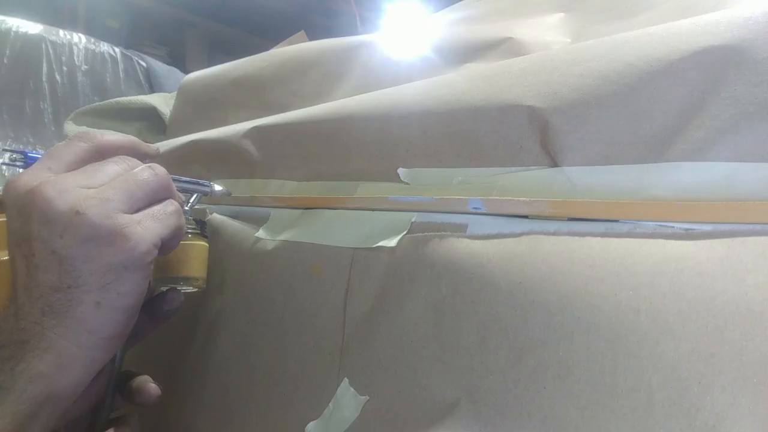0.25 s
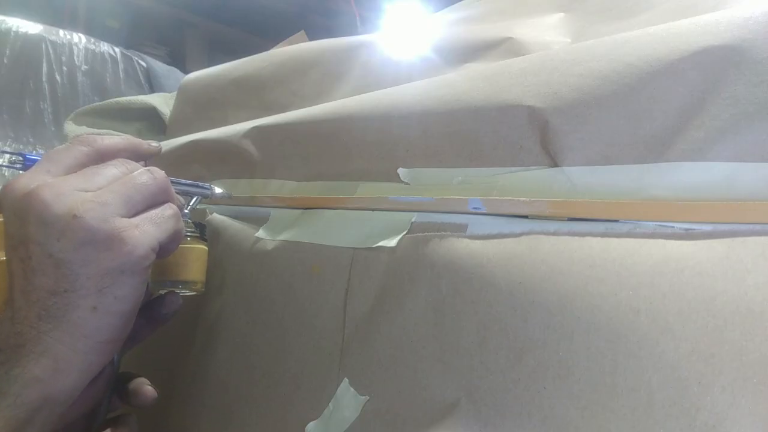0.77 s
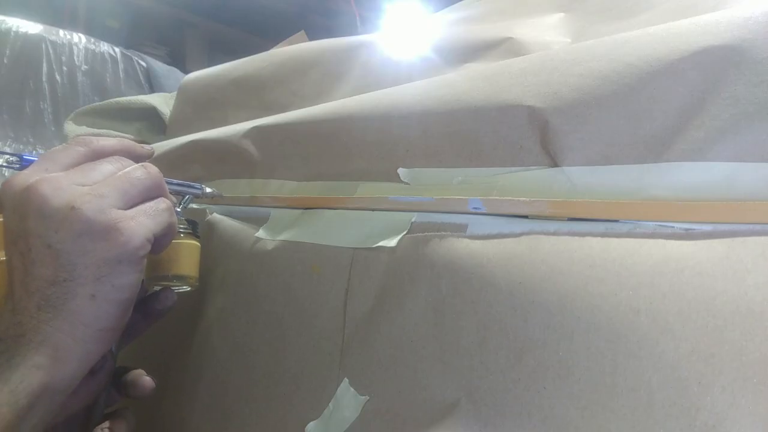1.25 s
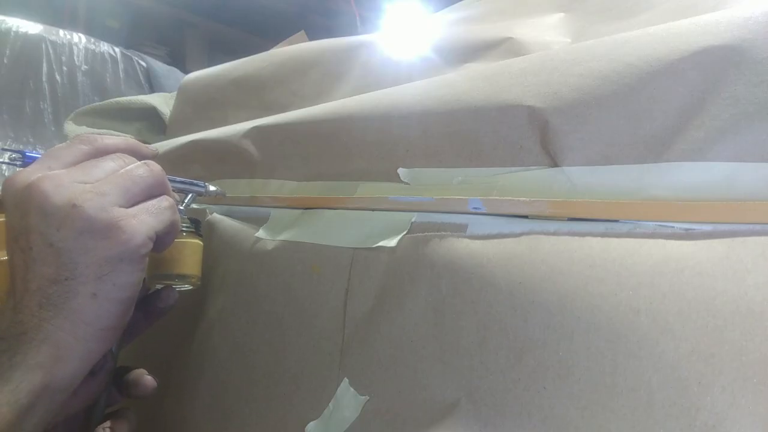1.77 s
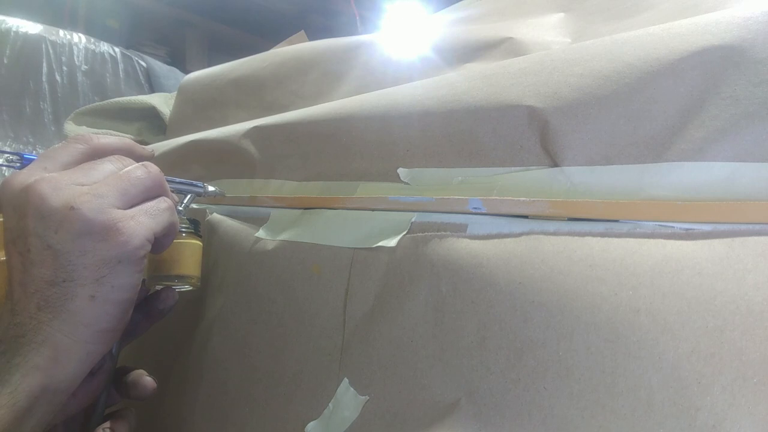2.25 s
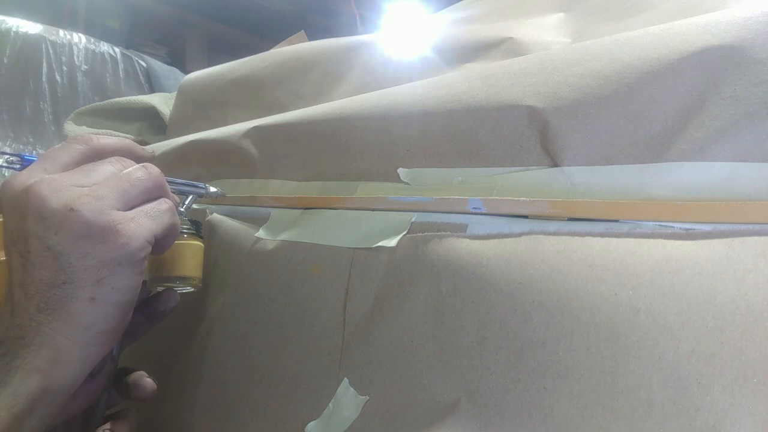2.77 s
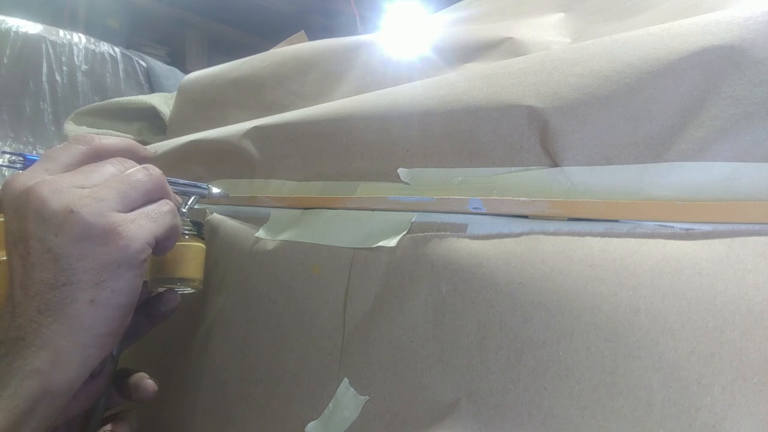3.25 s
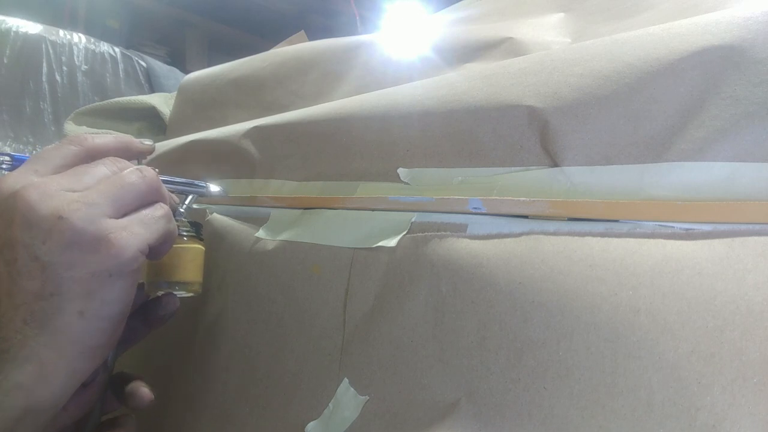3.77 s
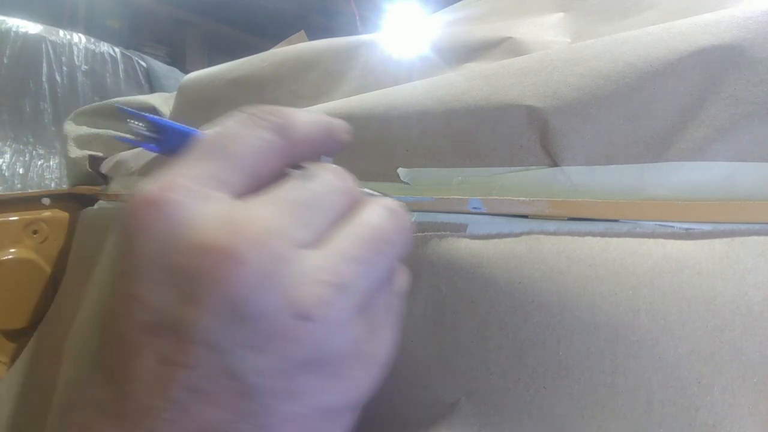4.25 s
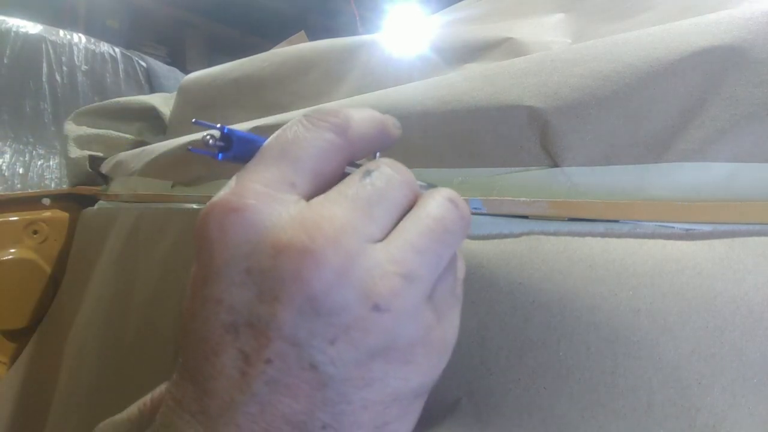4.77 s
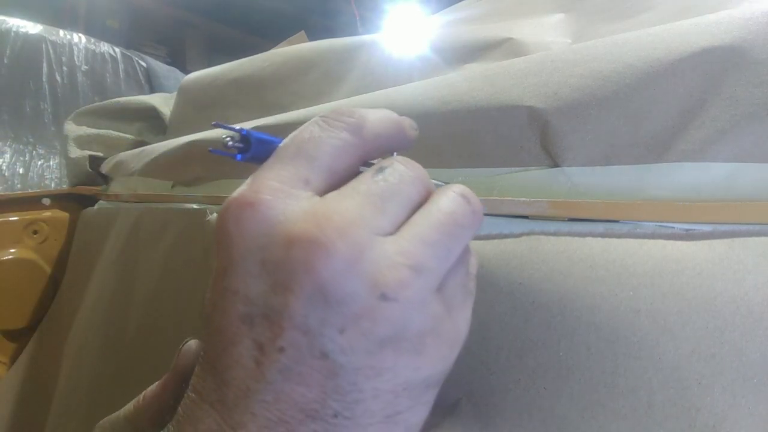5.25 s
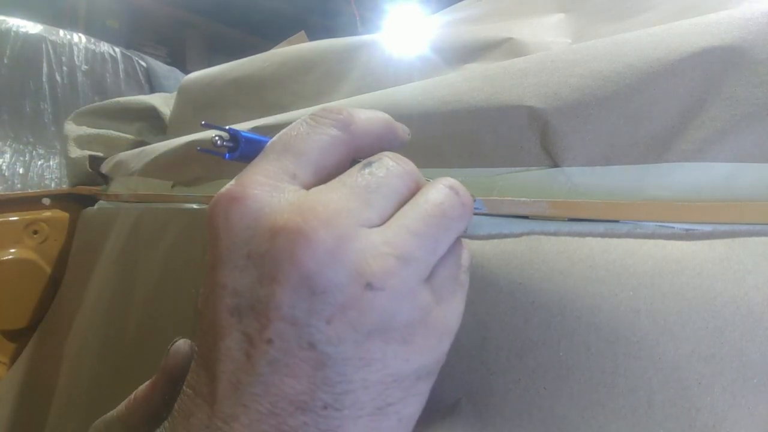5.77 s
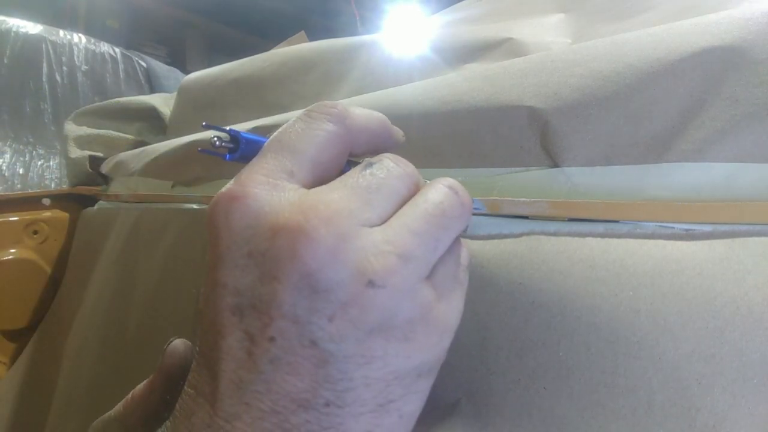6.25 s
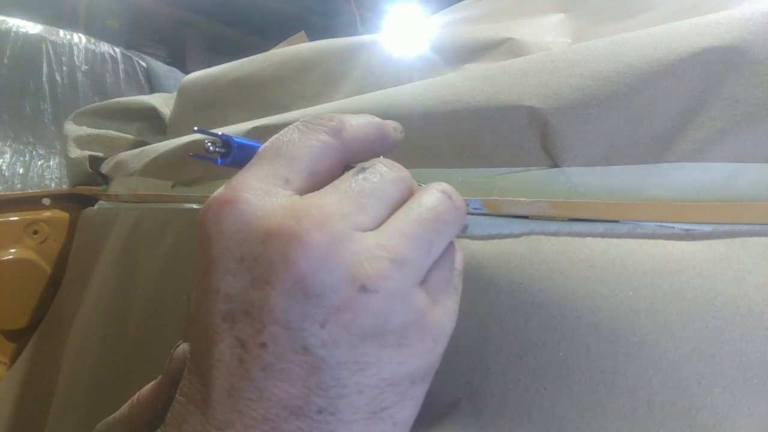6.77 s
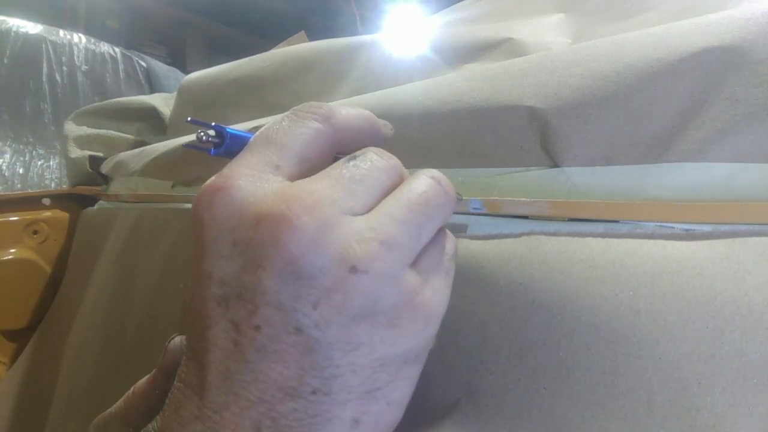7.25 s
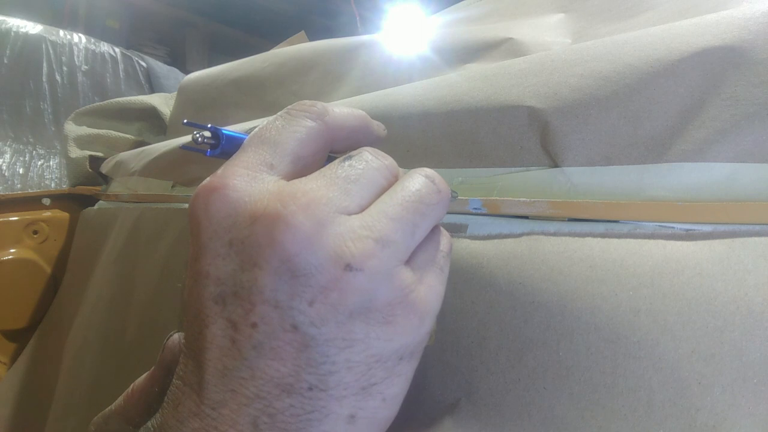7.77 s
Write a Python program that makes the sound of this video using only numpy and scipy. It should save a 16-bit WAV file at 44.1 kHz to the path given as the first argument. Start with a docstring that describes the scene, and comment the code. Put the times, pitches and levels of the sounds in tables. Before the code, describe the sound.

An airbrush sprays paint close to the microphone in a quiet garage, hissing in four bursts that each cut off sharply. The second burst is the longest and wavers in strength. In the long pause after it, a hand softly brushes masking paper, a small metal fitting clinks and the hand bumps a panel. Two more bursts follow. Very faint crickets chirp over a low room rumble.

```python
"""Garage: an airbrush sprays masked car bodywork in four bursts, close by.
The air jet hisses, coloured by reflections from hand and panel; the trigger swells and brightens it.
In the long pause the hand brushes the masking paper, a metal fitting clinks, the hand bumps the panel.
Two faint crickets chirp over a low room rumble."""
import sys
import numpy as np
from scipy import signal
from scipy.fft import rfft, irfft
from scipy.io import wavfile

SR = 44100
rng = np.random.default_rng(int(sys.argv[2]) if len(sys.argv) > 2 else 0)


def transcribe(u):
    """Save the signal u as a 16-bit wav file named by the first command-line argument.

    u: samples, shape (n,) or (channels, n), limited to [-1, 1]; the rate is SR.
    q: integer samples, one column per channel.
    """
    v = np.clip(np.atleast_2d(u).T, -1, 1)
    q = np.round(v * 32767).astype(np.int16)
    wavfile.write(sys.argv[1], SR, q)


N = 352800
TIME, FREQ = np.arange(N) / SR, np.fft.rfftfreq(N, 1 / SR)


def airbrush(usual_db=-36, flutter_db=0.4, buffet_db=0.4, dulling=0.37):
    """Valve-gated air jet, as (close, room send); paint flow flutters, air buffets the panel."""
    # open t/s, shut t/s, opening time/s, hand position index, rush trim/dB, fizz trim/dB
    bursts = [(-.1, 0.713, .02, 0, -15.5, -9.5), (1.384, 3.534, 0.022, 0, -17, -8.5),
              (5.646, 6.592, 0.04, 1, -12.5, -6), (7.086, 8.2, .02, 2, -11, -12)]
    # jet strength under the trigger, per burst: t/s, level/dB
    strengths = [[(0.01, -29.5), (0.154, -33.5), (0.286, -29), (0.348, -36), (0.7, -39)], [(1.39, -37.5), (1.56, -32), (1.69, -36.5), (1.86, -30), (2.03, -31),
                                     (2.08, -35), (2.24, -34.5), (2.37, -30.5), (2.44, -34.5), (2.62, -32),
                                     (2.75, -36.5), (3.31, -37.5), (3.43, -30), (3.53, -32)], [(5.66, -37), (6.504, -37.5), (6.59, -42.5)], [(7.1, -36.5), (7.2, -37),
                                                                            (7.57, -34), (7.694, -36),
                                                                            (7.802, -31.5), (7.98, -31)]]
    # jet spectrum, per hand position: f/Hz, level/dB
    colours = [[(150.0, -37), (350.0, -25), (520.0, -25.5), (750.0, -20.5), (1050.0, -25.5),
                (1600.0, -16.5), (2300.0, -9), (3500.0, 0), (5500.0, -0.5), (8200.0, 2.5), (10500.0, -9),
                (13000.0, -13), (15500.0, -12.5)], [(150.0, -33), (350.0, -17.5), (520.0, -25), (750.0, -15),
                                    (1050.0, -19.5), (1600.0, -4.5), (2300.0, -5.5), (3500.0, 3.5),
                                    (5500.0, 4), (8200.0, 0), (10500.0, -9), (13000.0, -11),
                                    (15500.0, -13.5)], [(150.0, -34), (350.0, -16.5), (520.0, -30.5),
                                                         (750.0, -15), (1050.0, -20.5), (1600.0, -7),
                                                         (2300.0, -5.5), (3500.0, 1), (5500.0, -3.5),
                                                         (8200.0, -2.5), (10500.0, -13), (13000.0, -24),
                                                         (15500.0, -20)]]
    # reflections off hand, cup and panel, per position: delay/ms, gain
    echoes = [[(0.444, -0.12), (0.579, 0.2), (0.71, 0.17), (0.946, 0.087), (1.013, -0.18), (1.128, 0.14),
               (1.232, -0.13), (1.937, -0.13)], [(0.266, 0.15), (0.547, -0.13), (0.673, -0.18), (0.785, -0.098),
                                   (0.943, -0.26), (1.3, -0.052), (1.467, -0.15), (2.02, -0.13)], [(0.491, 0.085), (0.617, 0.12), (0.716, 0.13),
                                                        (0.875, 0.21), (0.95, -0.069), (1.201, 0.113),
                                                        (1.401, 0.049), (2.047, -0.097)]]
    # peaks and notches of the hand-panel hollow, per position: f/Hz, width/Hz, level/dB
    hollows = [[(947, 71, 8.5), (1390, 200, 3.5), (1490, 93, -4), (2296, 83, 5.5), (3620, 330, 4.5),
                (3800, 430, -11), (3850, 46, 16), (4004, 56, 13), (4450, 87, 2.5), (4800, 200, -3),
                (5500, 36, -19), (6020, 78, 8.5), (6220, 170, -7.5), (6680, 48, 11), (7230, 43, 3),
                (9050, 48, -1), (9600, 590, 5), (11300, 70, 3.5), (12550, 250, 3), (13050, 187, 2)], [(603, 96, 5.5), (1240, 150, 5), (1463, 48, 6), (2500, 66, 6),
                                    (2530, 96, -3), (3030, 60, 6.5), (3666, 120, 2.5), (3870, 120, -8),
                                    (4350, 91, 4.5), (4770, 70, -10), (5050, 200, 2), (5320, 78, -10),
                                    (7440, 250, -12), (10530, 60, 7), (12700, 61, 7.6)], [(563, 180, 17.5), (1390, 93, -5.5),
                                                         (2810, 73, 7.5), (2900, 76, -4), (3430, 60, -3),
                                                         (3710, 110, 7), (4200, 480, 4), (4880, 53, -10),
                                                         (4960, 200, 9), (5710, 60, -8), (5780, 170, 8.5),
                                                         (6660, 200, 7.5), (12300, 260, 7), (13182, 270, 6),
                                                         (14150, 300, 5), (14650, 200, -4)]]
    # drift between thin (-) and hollow (+) spray: t/s, rush gain/dB
    tilt = [(0, 0), (1.4, -1.5), (1.68, -1.5), (1.98, .3), (2.58, 1.4), (2.85, -0.1), (5.64, -0.2),
            (6.0, 4), (6.36, -1.5), (6.52, -1), (8, -2)]
    positions = [jet_bands(*tables) for tables in zip(colours, echoes, hollows)]
    buffet = amp(buffet_db * wander(rate_hz=150))
    tilt_db = np.interp(TIME, *np.transpose(tilt), 0, 0)
    out = np.zeros((2, N))
    for (open_s, shut_s, opening_s, position, rush_trim_db, fizz_trim_db), jet in zip(bursts, strengths):
        rush, hiss, fizz = positions[position]
        lift = valve(open_s, shut_s, opening_s)
        # stronger jet: brighter
        push_db = np.interp(TIME, *np.transpose(jet)) - usual_db
        rush_db = rush_trim_db - 0.48 + 0.26 * push_db + tilt_db
        hiss_db = push_db - 1.25
        fizz_db = fizz_trim_db - 0.5 + 1.23 * push_db - 0.65 * tilt_db
        # half-open valve: slow, dull jet; rush first, fizz last
        out += rush * amp(rush_db) * buffet * lift ** (1 - dulling)
        out += hiss * amp(hiss_db) * lift
        out += fizz * amp(fizz_db) * lift ** (1 + dulling)
    return out * amp(usual_db + flutter_db * wander(rate_hz=45))


def jet_bands(colour, echoes, hollow):
    """Turbulence split into panel rush, hiss and atomising fizz; each as (combed by surfaces, free)."""
    comb = 1 + sum(gain * np.exp(-2j * np.pi * FREQ * ms / 1000) for ms, gain in echoes)
    free = rfft(rng.standard_normal(N)) * amp(log_interp(colour, FREQ))
    close = free * comb * amp(peaks_db(hollow))
    low = 1 / (1 + (FREQ / 2300) ** 8)
    high = 1 - 1 / (1 + (FREQ / 10300) ** 16)
    bands = []
    for share, lo_hz, hi_hz in [(low, 500, 2200), (1 - low - high, 2500, 10000), (high, 10500, 15500)]:
        reference_rms = np.std(irfft(close * (FREQ > lo_hz) * (FREQ < hi_hz), N))
        bands.append(irfft(np.array([close, free]) * share, N) / reference_rms)
    return bands


def valve(open_s, shut_s, opening_s, leak_db=-22, leak_s=0.022, snap_s=0.007):
    """Air leaks as the trigger goes down, the valve lifts, its spring snaps it shut."""
    early_s = np.maximum(open_s - TIME, 0)
    leak = amp(leak_db) * np.exp(-early_s / leak_s)
    lift = np.maximum(np.exp(-3 * early_s / opening_s), leak)
    return lift * np.exp(-np.maximum(TIME - shut_s, 0) / snap_s)


def hand_rubs(rise_s=0.0019):
    """Sleeve and hand slide and scuff over masking paper: shaped friction noise."""
    # friction spectra: f/Hz, level/dB
    sleeve_colour = [(100, -32), (200, -0.5), (270, -6), (390, 3), (560, -10.5), (1300, -16.5), (3000, -30)]
    paper_colour = [(300, -24), (700, -4), (1300, -4), (1700, -9), (2300, 0), (3400, -5), (5000, -15),
                    (12000, -30)]
    # peak t/s, swell/s, fade/s, sleeve level/dB, paper level/dB
    slides = [(4.75, .6, 0.44, -70.5, -83), (5.04, 0.05, 0.071, -64, -69), (5.19, 0.088, 0.068, -78, -69)]
    # t/s, level/dB, decay/s, low f/Hz, high f/Hz
    scuffs = [(4.535, -70, .008, 700, 1800), (4.742, -63, .007, 800, 2000), (4.983, -65, 0.024, 900, 4200),
              (5.008, -54, 0.015, 900, 5240)]
    sleeve, paper, out = noise(sleeve_colour), noise(paper_colour), np.zeros(N)
    for at_s, swell_s, fade_s, sleeve_db, paper_db in slides:
        speed = np.exp(-((TIME - at_s) / np.where(TIME < at_s, swell_s, fade_s)) ** 2)
        out += speed * (amp(sleeve_db) * sleeve + amp(paper_db) * paper)
    t = np.arange(SR // 4) / SR
    for at_s, db, decay_s, lo_hz, hi_hz in scuffs:
        bandpass = signal.butter(4, [lo_hz, hi_hz], "band", fs=SR, output="sos")
        rub = unit(signal.sosfilt(bandpass, rng.standard_normal(len(t))))
        stroke = (1 - np.exp(-t / rise_s)) * np.exp(-t / decay_s)
        add(out, at_s, amp(db) * rub * stroke / stroke.max())
    return out


def knocks():
    """A small metal fitting clinks and the hand bumps the panel; each rings in its modes."""
    # strikes: t/s, level/dB
    clinks = [(5.011, -54.5), (5.024, -60)]
    bumps = [(5.19, -46.5), (5.218, -61), (5.226, -53), (5.238, -66)]
    # modes: f/Hz, level/dB, t60/s
    fitting = [(1360, -2, 0.12), (2050, -7, 0.091), (3560, -4, 0.072), (3758, 0, 0.073), (4460, -2, 0.1),
               (4860, -4, .1), (5220, -7, .11), (7833, -6, 0.11), (11900, -14, .07)]
    panel = [(204, 1.5, 0.058), (240, 0, .05), (372, 5.5, 0.068), (447, -6, 0.076), (570, -9, 0.078),
             (785, -9, .06), (1040, -20, .05), (1400, -16, .06)]
    out = np.zeros(N)
    for at_s, db in clinks:
        add(out, at_s, amp(db) * ring(fitting, rise_s=0.00091))
    for at_s, db in bumps:
        add(out, at_s, amp(db) * ring(panel, rise_s=0.0019))
    return out


def ring(modes, rise_s):
    """Struck body: decaying sines, soft onset."""
    t = np.arange(SR // 3) / SR
    partials = sum(amp(db - 60 * t / t60_s) * np.sin(2 * np.pi * hz * t) for hz, db, t60_s in modes)
    return partials * (1 - np.exp(-t / rise_s))


def crickets():
    """Two crickets, one higher, one lower, in runs of even chirps."""
    # start t/s, end t/s, chirp period/s
    high_runs = [(.799, 3.6, .1263), (3.663, 4.0, .1305), (4.178, 6.6, .118), (6.695, 8.0, .129)]
    low_runs = [(.857, 6.65, .1332), (6.768, 8.0, .1345)]
    high = cricket(high_runs, glide_hz=(7400, 6960), stroke_s=0.0099, step_s=0.026,
                   strokes_db=[-70, -67.5, -79])
    low = cricket(low_runs, glide_hz=(6900, 6640), stroke_s=0.01, step_s=0.029, strokes_db=[-69, -72])
    return high + low


def cricket(runs, glide_hz, stroke_s, step_s, strokes_db, jitter_s=0.002):
    """Each chirp is a few wing strokes, each stroke a short falling tone."""
    out, size = np.zeros(N), round(stroke_s * SR)
    phase = 2 * np.pi * np.cumsum(np.linspace(*glide_hz, size)) / SR
    window = signal.windows.tukey(size, 0.6)
    for at_s in np.concatenate([np.arange(*run) for run in runs]):
        for k, db in enumerate(strokes_db):
            force, detune, late = rng.standard_normal(3)
            tone = np.sin(phase * (1 + 0.009 * detune)) * window
            add(out, at_s + k * step_s + jitter_s * late, amp(db + 1.7 * force) * tone)
    return out


def clutter(x, scatter_db):
    """Small nearby objects scatter the treble and ripple its spectrum."""
    size = round(0.012 * SR)
    taps = rng.standard_normal(size) * (np.arange(size) > size // 6)
    taps = signal.sosfilt(signal.butter(1, 4000, "high", fs=SR, output="sos"), taps)
    return x + amp(scatter_db) * signal.fftconvolve(x, taps / np.linalg.norm(taps))[:N]


def garage(x, predelay_s=0.003, tap_density=0.05):
    """Reverberation: sparse reflections of random sign, dying away band by band."""
    # f/Hz, t60/s
    decay = [(200, 0.46), (1500, 0.23), (4500, 0.28), (8000, 0.22), (15000, 0.27)]
    size = SR // 2
    taps = rng.choice([-1., 1.], size) * (rng.random(size) < tap_density)
    taps *= np.arange(size) > predelay_s * SR
    hz, t, bands = signal.stft(taps, SR, nperseg=256)
    t60_s = log_interp(decay, hz)[:, None]
    _, tail = signal.istft(bands * amp(-60 * t / t60_s), SR)
    return signal.fftconvolve(x, tail / np.linalg.norm(tail))[:N]


def background(gain_db=-65.24):
    """Room rumble and a faint, slightly ringing hiss."""
    # spectrum: f/Hz, level/dB
    colour = [(24, -29), (45, -4), (70, -1.5), (115, -2.5), (200, -10.5), (350, -17.5), (550, -24.5),
              (2300, -31.5), (4100, -27.5), (5600, -28.5), (6700, -28.5), (9300, -27.5), (12500, -32.5),
              (15500, -28)]
    # f/Hz, width/Hz, level/dB
    hiss_peaks = [(2980, 170, 4.5), (4040, 110, 2), (5170, 70, 3), (6380, 200, 7), (8580, 70, 2),
                  (8900, 90, 4), (9300, 60, 9), (9410, 60, 1), (10705, 64, 5), (11070, 70, 11),
                  (13610, 80, 1), (13700, 80, 7)]
    return amp(gain_db) * clutter(noise(colour, hiss_peaks), scatter_db=-10)


def noise(colour, peaks=()):
    """Noise of given spectrum, rms 1."""
    gain = amp(log_interp(colour, FREQ) + peaks_db(peaks))
    return unit(irfft(rfft(rng.standard_normal(N)) * gain, N))


def wander(rate_hz):
    """Slow random motion, rms 1."""
    return unit(irfft(rfft(rng.standard_normal(N)) / (1 + (FREQ / rate_hz) ** 4), N))


def peaks_db(peaks):
    """Narrow peaks and notches over FREQ."""
    return sum(db / (1 + (2 * (FREQ - hz) / width_hz) ** 2) for hz, width_hz, db in peaks)


def log_interp(points, hz):
    """Table lookup on a log-frequency axis."""
    knots_hz, values = np.transpose(points)
    return np.interp(np.log(hz + 1), np.log(knots_hz + 1), values)


def amp(db):
    """dB to gain."""
    return 10 ** (np.asarray(db) / 20)


def unit(x):
    """Scale to rms 1."""
    return x / np.sqrt(np.mean(x ** 2) + 1e-30)


def add(mix, at_s, sound):
    """Mix a sound in at at_s."""
    part = mix[max(round(at_s * SR), 0):][:len(sound)]
    part += sound[:len(part)]


def scene():
    """Close airbrush and hand, distant crickets; two identical channels."""
    chirps = crickets()
    close_jet, free_jet = airbrush()
    handling = hand_rubs() + knocks()
    room = garage(amp(-7.5) * free_jet + amp(-9.5) * handling + amp(-1) * chirps)
    mono = clutter(close_jet, scatter_db=-12.5) + handling + chirps + room + background()
    return np.array([mono, mono])


def record(dry, cutoff_hz=15800):
    """Steep low-pass."""
    lowpass = signal.firwin(711, cutoff_hz, window=("kaiser", 9), fs=SR)
    return signal.oaconvolve(dry, lowpass[None], "same")


dry = scene()
out = record(dry)
transcribe(out)
```